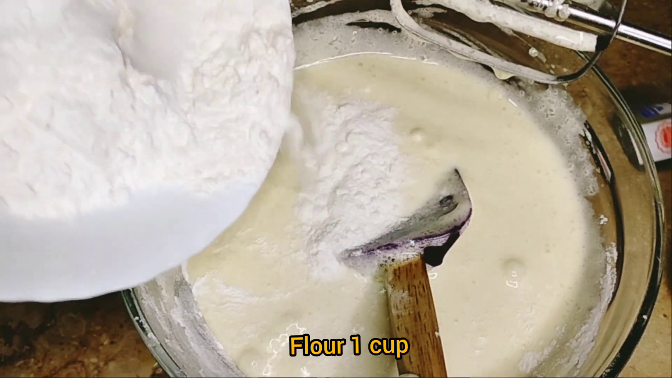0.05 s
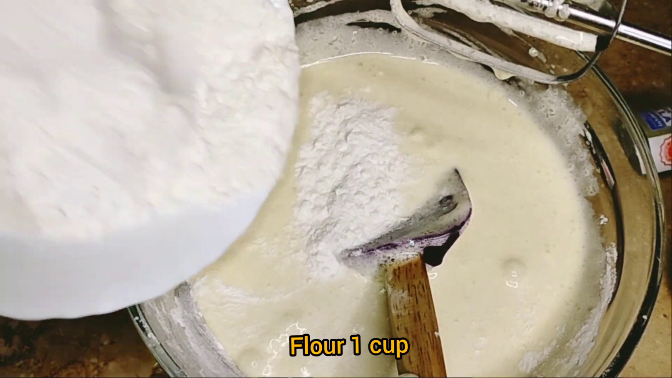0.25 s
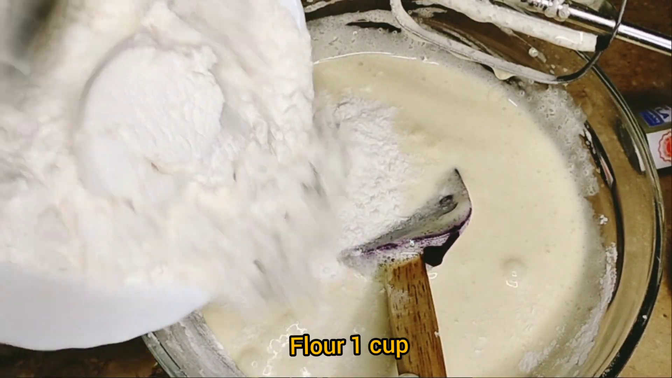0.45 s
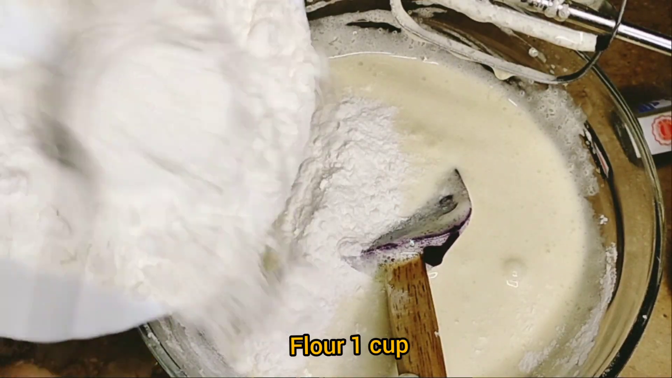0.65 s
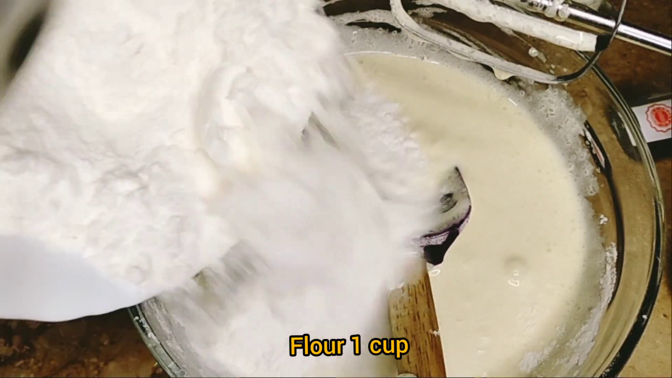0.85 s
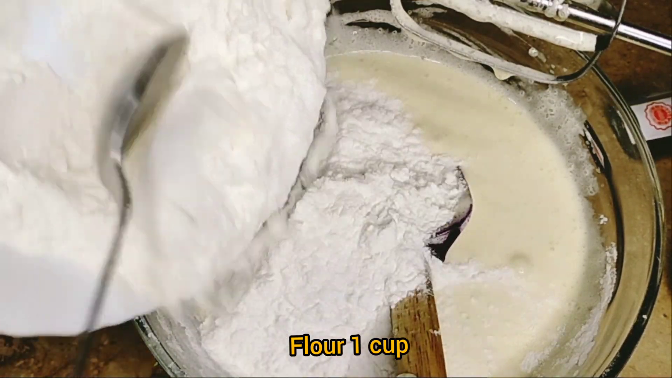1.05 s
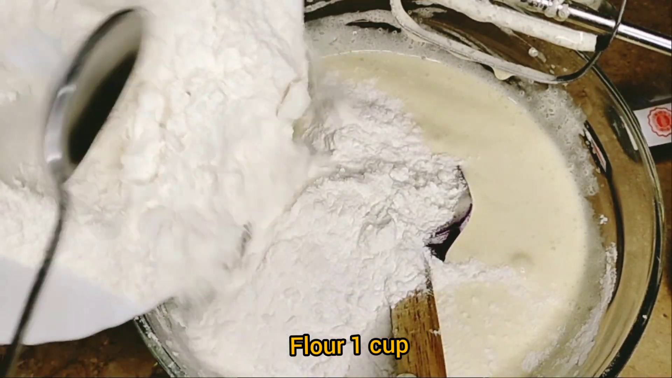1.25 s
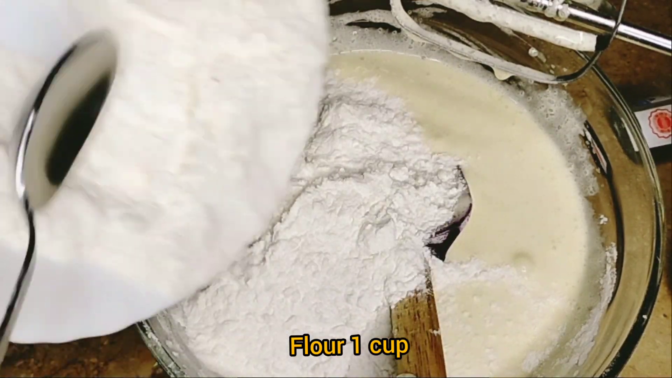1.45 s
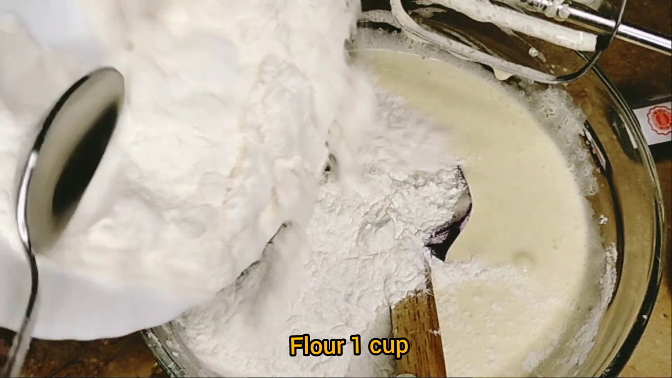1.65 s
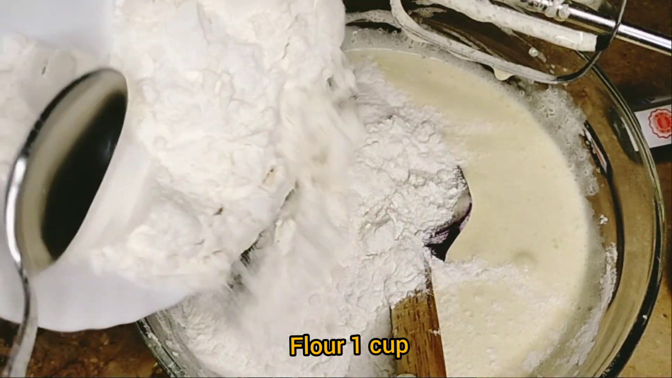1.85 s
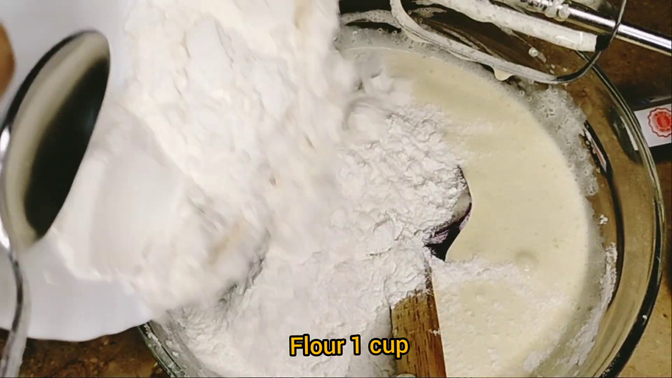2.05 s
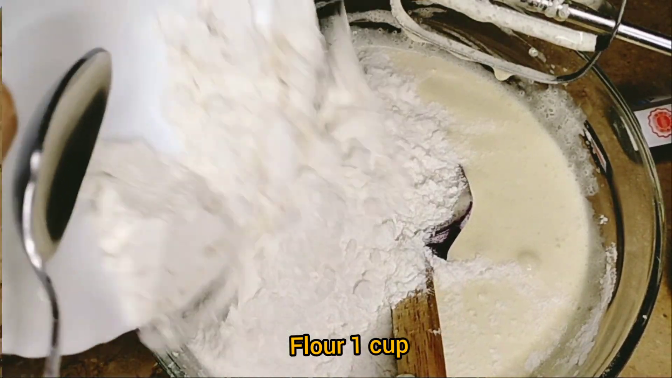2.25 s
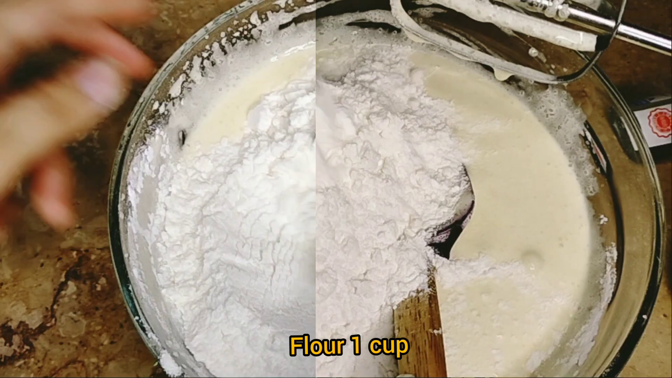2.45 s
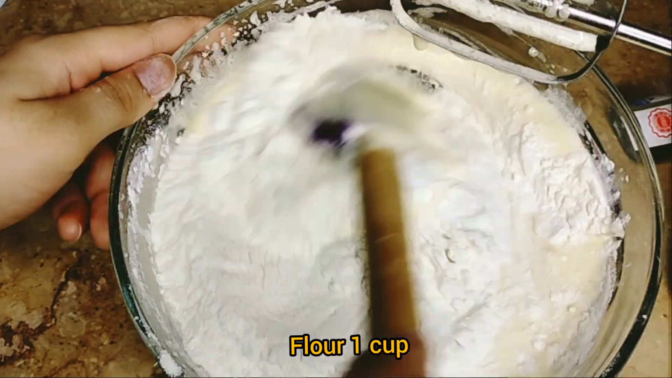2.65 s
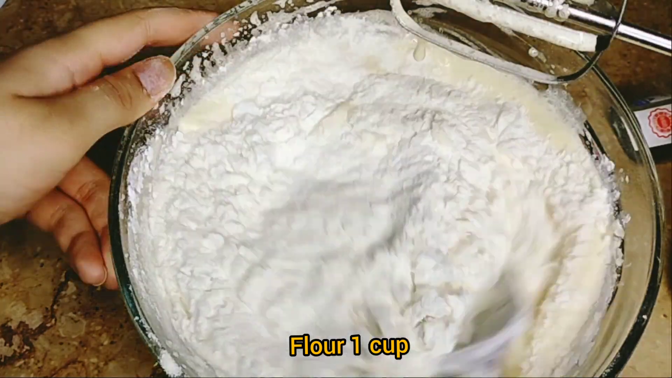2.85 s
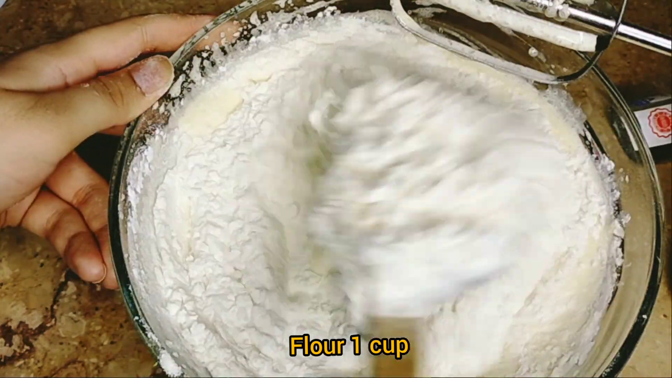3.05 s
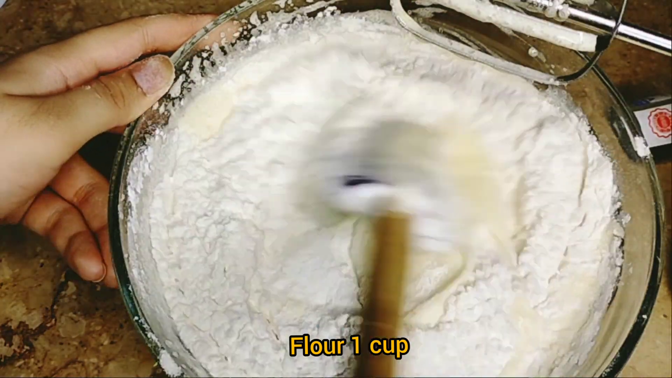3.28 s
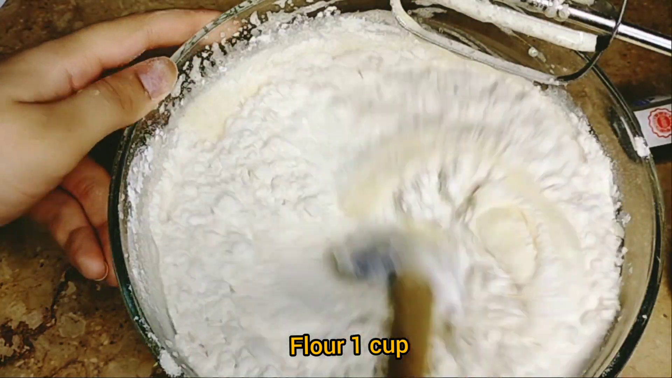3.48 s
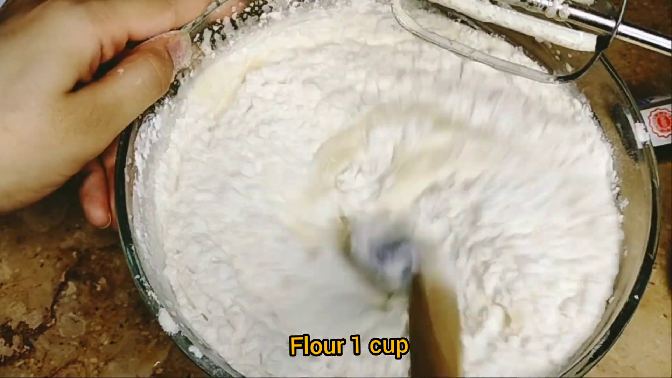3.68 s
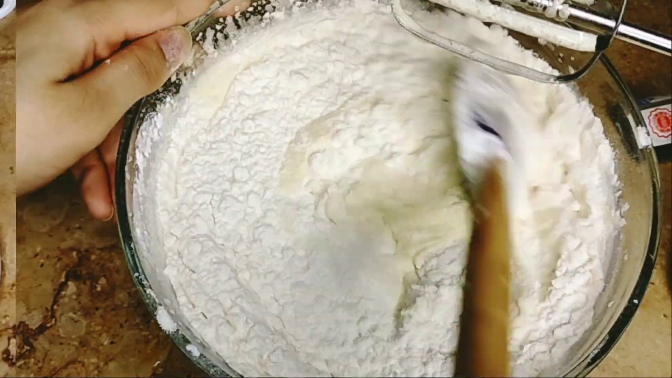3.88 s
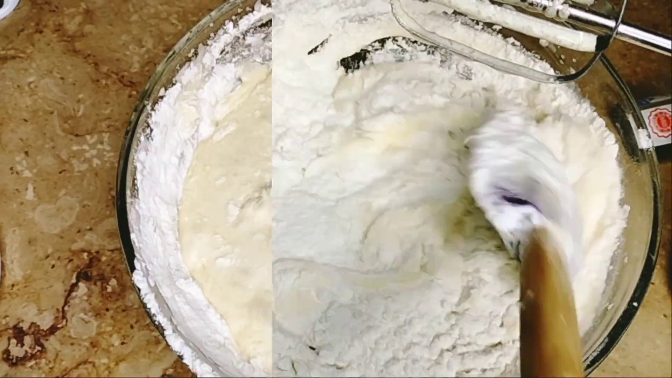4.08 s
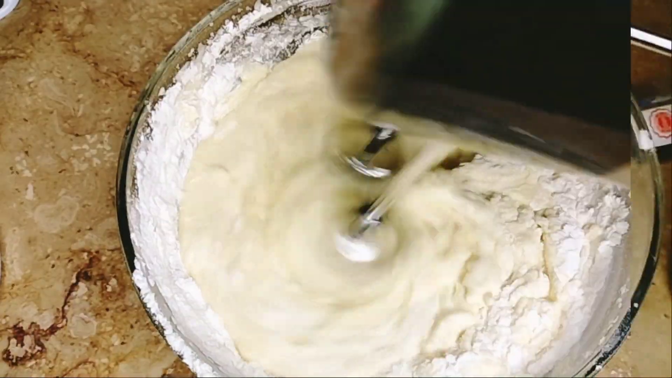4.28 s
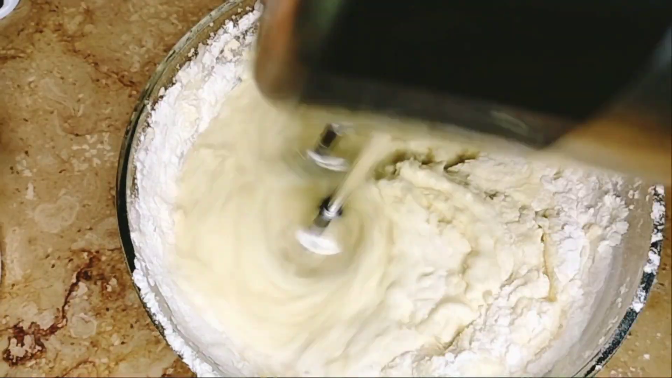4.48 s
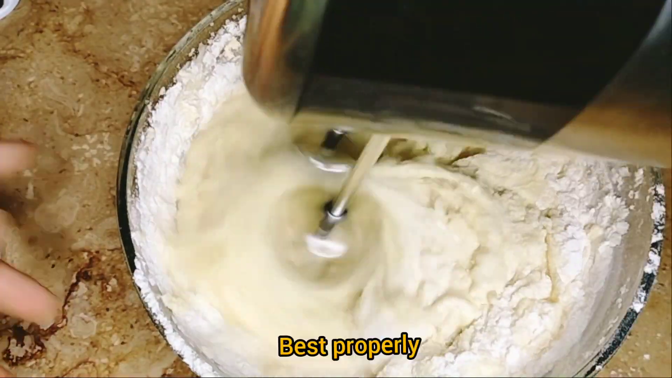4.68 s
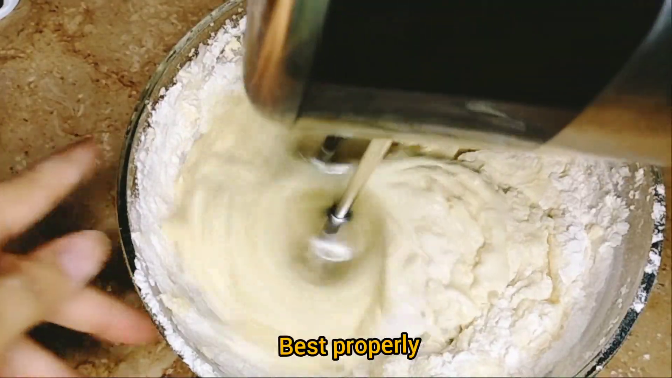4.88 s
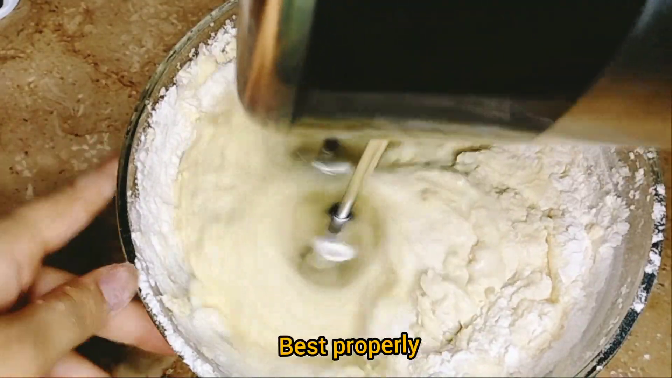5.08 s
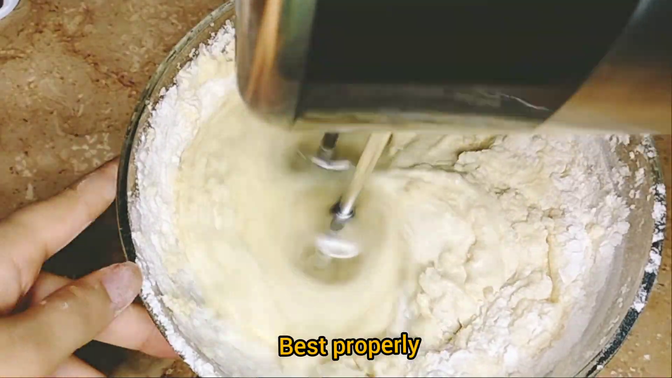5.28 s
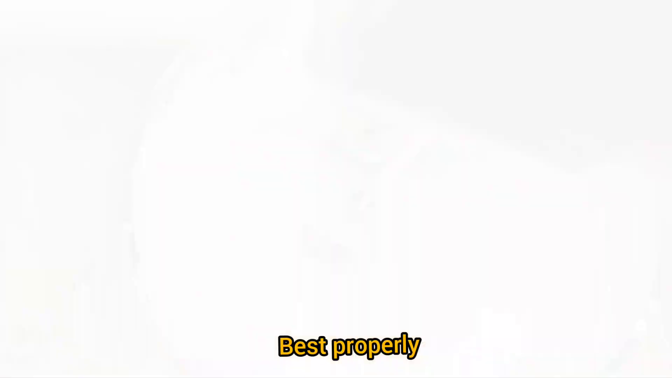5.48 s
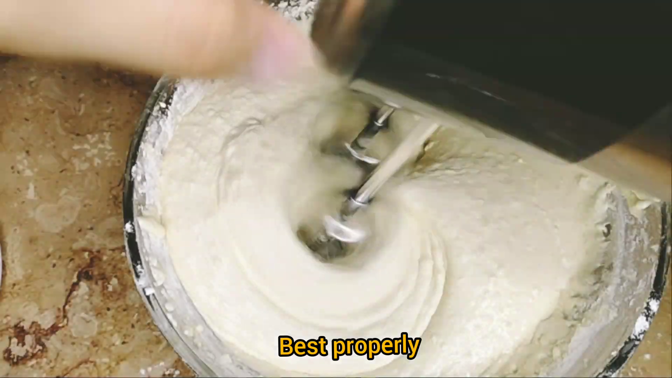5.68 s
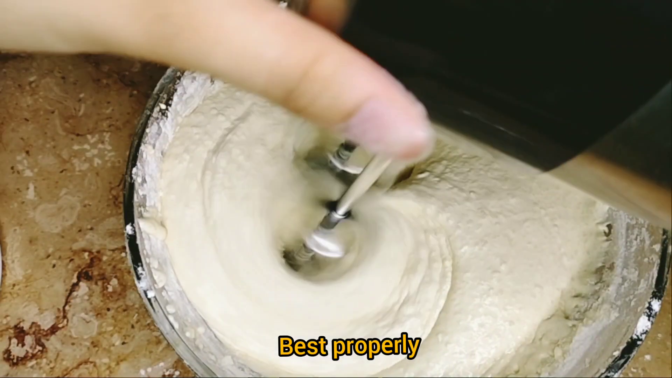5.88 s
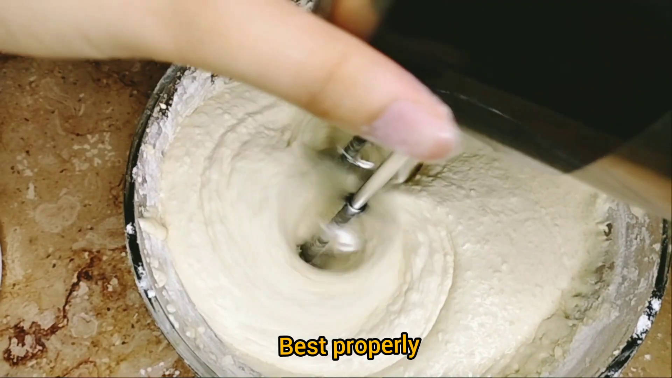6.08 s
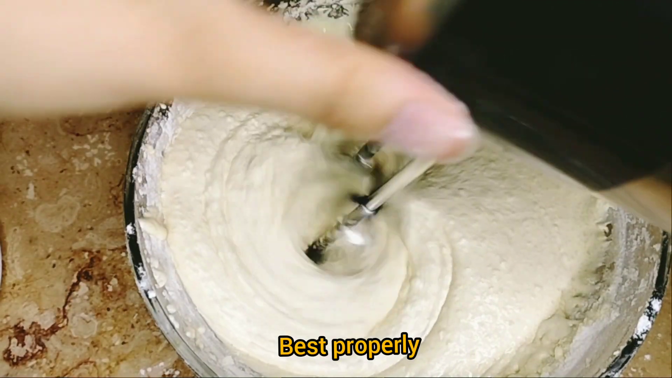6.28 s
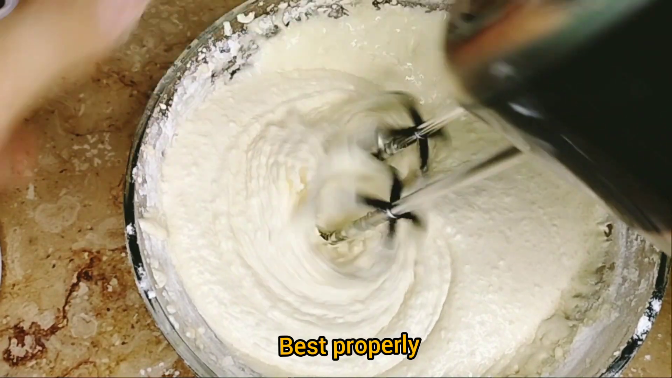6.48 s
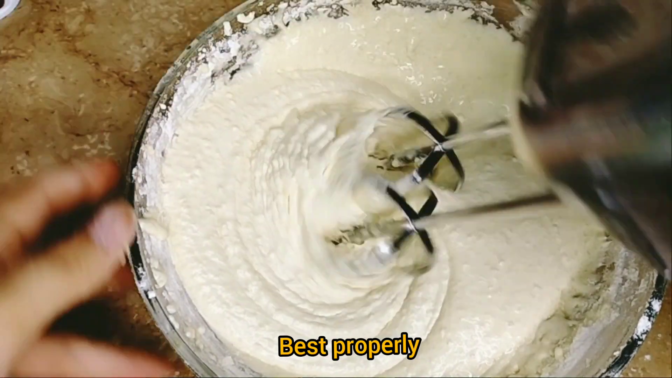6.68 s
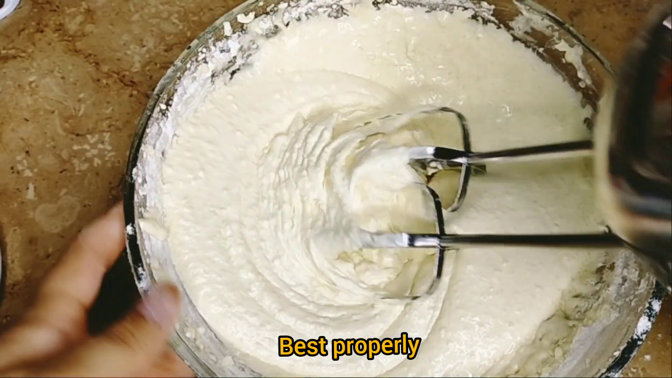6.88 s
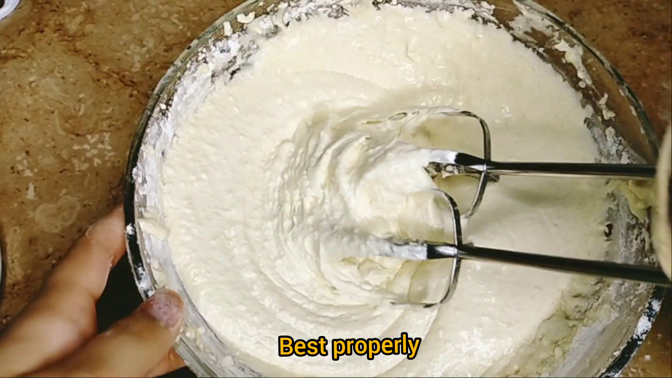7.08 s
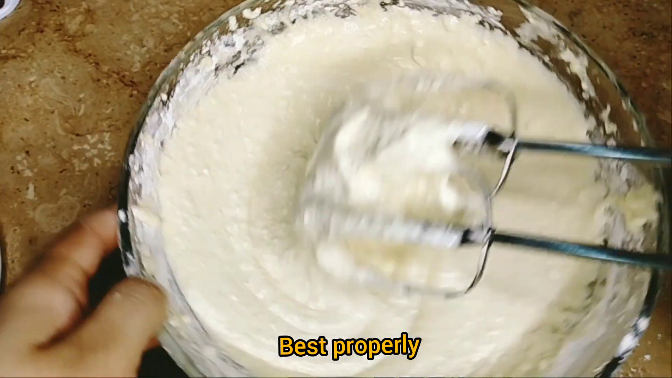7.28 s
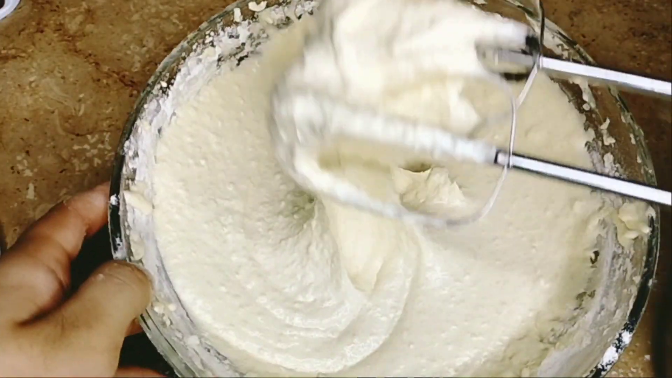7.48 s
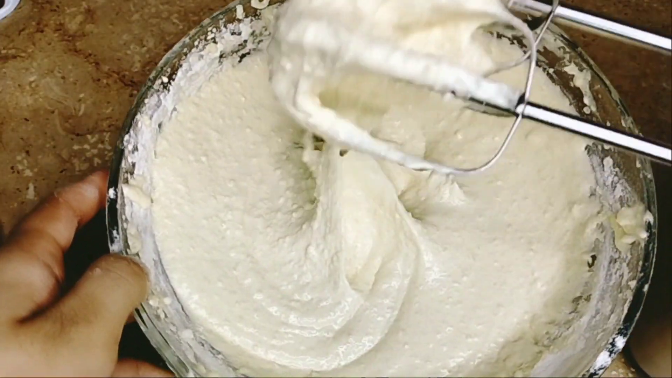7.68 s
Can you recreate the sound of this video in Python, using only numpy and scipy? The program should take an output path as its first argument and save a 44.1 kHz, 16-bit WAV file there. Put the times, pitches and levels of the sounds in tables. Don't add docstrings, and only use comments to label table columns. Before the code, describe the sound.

Sparse china clinks and soft flour slides, then an electric mixer roars in batter, fades, returns coasting to a stop, followed by knocks and squeaky wipes on glass.

```python
import sys
import numpy as np
from scipy import signal
from scipy.fft import rfft, irfft
from scipy.io import wavfile
from scipy.ndimage import uniform_filter1d

SR = 44100
rng = np.random.default_rng(int(sys.argv[2]) if len(sys.argv) > 2 else 0)


def transcribe(signal):
    frames = np.atleast_2d(signal).T
    limited = np.clip(frames, -1, 1)
    pcm = np.round(limited * 32767).astype(np.int16)
    wavfile.write(sys.argv[1], SR, pcm)


def rack_gain(trim_db):
    fader = np.asarray(trim_db, float)
    return 10 ** (fader / 20)


N = 340893
T = np.arange(N) / SR

SWITCH_ON_S, JOIN_S, POWER_OFF_S = 3.803, 5.505, 5.72
TOP_TURNS_PER_S = 288.8
POWERED = T < POWER_OFF_S
MAINS_STEP = 2 * np.pi * 2 * 50 * T
PULL = np.cos(MAINS_STEP) * POWERED

# time [s], load [dB].
LOAD = [(3.86, 2), (4.23, 0.5), (4.35, 6), (4.67, 9.5), (5.2, 8), (5.3, 2.5), (5.5, -0.5), (5.51, -7.5),
        (6.0, -2), (6.12, -5), (6.25, -4)]
# frequency [Hz], level [dB], t60 [s].
COUNTER = [(96, -13, 0.23), (179.5, -5, 0.289), (195, -7, 0.32)]


def in_time(rows, outside=None):
    s, *columns = np.transpose(rows)
    return [np.interp(T, s, c, outside, outside) for c in columns]


def rms_one(x):
    return x / np.sqrt(np.mean(x ** 2) + 1e-20)


def colour(x, points):
    hz, db = np.transpose(points)
    log_hz, grid = np.log(hz), np.log(np.linspace(1, SR / 2, 4097))
    outside = np.maximum(log_hz[0] - grid, 0) + np.maximum(grid - log_hz[-1], 0)
    shape_db = np.interp(grid, log_hz, db) - 30 * outside
    cepstrum = irfft(shape_db * np.log(10) / 20)
    cepstrum[1:4096] *= 2
    cepstrum[4097:] = 0
    return signal.fftconvolve(x, irfft(np.exp(rfft(cepstrum))))[:len(x)]


def noise(points):
    return rms_one(colour(rng.standard_normal(N), points))


def band_pass(x, order, low_hz, high_hz):
    return signal.sosfilt(signal.butter(order, [low_hz, high_hz], "band", fs=SR, output="sos"), x)


def drift(rate_hz):
    knots_s = np.arange(0, N / SR + 1, .5 / rate_hz)
    return np.interp(T, knots_s, rng.standard_normal(len(knots_s)))


def resonate(x, hz, width_hz):
    r = np.exp(-np.pi * width_hz / SR)
    feedback = [1, -2 * r * np.cos(2 * np.pi * hz / SR), r * r]
    return signal.lfilter(np.array([1, 0, -1]) * (1 - r * r) / 2, feedback, x)


def strike(times_s, db, modes, spread_db):
    out = np.zeros(N)
    luck = rng.standard_normal((len(times_s), len(modes)))
    for (hz, level_db, t60_s), own in zip(modes, luck.T):
        clicks = np.full(N, 1e-18)
        clicks[(times_s * SR).astype(int)] = rack_gain(db + level_db + spread_db * own)
        r, w = rack_gain(-60 / (t60_s * SR)), 2 * np.pi * hz / SR
        out += signal.lfilter([0, np.sin(w)], [1, -2 * r * np.cos(w), r * r], clicks)
    return out


def bursts(times_s, db, decay_s, rise_s):
    out = np.zeros(N)
    for s, level_db in zip(times_s, db):
        span = slice(int(s * SR), int((s + .2) * SR))
        age_s = np.maximum(T[span] - s, 0)
        out[span] += rack_gain(level_db) * (1 - np.exp(-age_s / rise_s)) * np.exp(-age_s / decay_s)
    return out


def swell(peak_s, rise_s, fall_s):
    rising, falling = (peak_s - T) / max(rise_s, .003), (T - peak_s) / max(fall_s, .003)
    away = np.where(T < peak_s, rising, falling)
    return rack_gain(-20 * np.minimum(away, 6) ** 1.04)


def shaft_speed():
    # time [s], extra speed [turns/s].
    lurch = [
        (3.81, 8.6),
        (3.87, 13),
        (3.908, 13),
        (3.984, -3.2),
        (4.11, -6),
        (4.2, -4),
        (4.3, 0),
    ]
    off_turns_per_s, sag_per_s, drag_per_s, friction_turns_per_s = 235, 135, .8, 165
    run_up = TOP_TURNS_PER_S * np.tanh((T - 3.735) / .415) + in_time(lurch)[0]
    after_s = T - POWER_OFF_S
    sag = off_turns_per_s - sag_per_s * after_s
    coast = (off_turns_per_s + friction_turns_per_s) * np.exp(-drag_per_s * after_s) - friction_turns_per_s
    return np.maximum(np.where(T < JOIN_S, run_up, np.where(after_s < 0, sag, coast)), 1)


def switch_on(rise_s):
    return np.clip((T - SWITCH_ON_S) / rise_s, 0, 1)


def loudness(law, speed):
    top_db, slope_db, share = np.array(law)[(T > JOIN_S).astype(int)].T
    level_db = top_db + slope_db * np.log2(speed / TOP_TURNS_PER_S) + share * in_time(LOAD)[0]
    return rack_gain(level_db) * switch_on(.04)


def orders(table, turn, waver_db):
    waver = [drift(25) for k in range(8)]
    return [(step, rack_gain(db + waver_db * waver[k % 8]) * np.sin(k * turn + step * MAINS_STEP))
            for k, step, db in table]


def shaft_hum(speed, turn):
    # shaft multiple, steps of twice the mains rate, level [dB].
    shaft_orders = [(1, 0, 3.5), (2, 0, -5), (2, -1, -12), (2, 1, -14), (3, 0, -9), (3, 1, -15),
                    (4, 0, -14), (5, 0, -13), (6, 0, -10), (6, -1, -12), (7, 0, -17), (8, 0, -13),
                    (9, 0, -13), (9, 1, -17), (10, -1, -23), (10, 0, -20)]
    # time [s], level [dB].
    grip = [(4.2, 3.5), (4.33, -0.5), (4.45, 2.5), (4.57, -11.5), (4.68, -4.5), (4.95, -1), (5.2, -1.5),
            (5.4, -3.5), (5.52, -5.5), (5.7, -13), (5.8, -8), (5.86, -15), (6.1, -21)]
    # level at top speed [dB], slope [dB/octave], share of load.
    hum_law = [(-39.5, 42, 0.44), (-33.5, 12, 0.53)]
    hum = sum(line * (POWERED if step else 1) for step, line in orders(shaft_orders, turn, .8))
    return rack_gain(4.0 + in_time(grip)[0]) * loudness(hum_law, speed) * hum


def brush_chatter(speed, turn, running):
    # shaft multiple, steps of twice the mains rate, level [dB].
    brush_orders = [(13, 1, -62), (16, 0, -67), (17, 0, -66), (18, 0, -68), (21, 0, -67), (23, -1, -67),
                    (23, 0, -69), (24, -1, -67), (25, 1, -67), (30, 0, -64), (48, 0, -79)]
    chatter = sum(line for step, line in orders(brush_orders, turn, 3))
    return np.sqrt(2) * chatter * (speed / TOP_TURNS_PER_S) ** 3 * POWERED * running


def slot_level(speed, running):
    # frequency [Hz], level [dB].
    whine = [(650, -39), (900, -41.5), (1150, -43.5), (1450, -34.5), (1750, -43), (2000, -42.5),
             (2200, -39.5), (2350, -34), (2550, -35.5), (2700, -32.5), (2900, -31), (3100, -41),
             (3400, -49.5)]
    hz, db = np.transpose(whine)
    slot_db = np.interp(np.log(12 * speed), np.log(hz), db)
    slot_db = slot_db + np.where(T < JOIN_S, 0, np.where(POWERED, -12, -46)) + 0.86 * in_time(LOAD)[0]
    return running * rack_gain(uniform_filter1d(slot_db, size=1500))


def slot_whine(turn, slot_gain):
    # steps of twice the mains rate, level [dB].
    slot_sides = [(-1, -4), (0, 1), (1, 0), (2, -7)]
    twelve = 12 * turn + .15 * drift(70)
    slot = sum(rack_gain(db) * np.sin(twelve + step * MAINS_STEP) * (POWERED if step else 1)
               for step, db in slot_sides)
    return slot_gain * rack_gain(0.68 * drift(30)) * slot


def commutator_note(speed, turn, running):
    # frequency [Hz], level [dB].
    commutator = [(1300, -3), (1750, 2), (2100, -5), (2480, 2), (2700, -4), (2850, 0), (3000, -2),
                  (3200, 4), (3550, -1), (4050, -3), (4300, 5), (4600, -2), (5000, 3), (5400, 2),
                  (5750, -5), (6200, 1), (6900, -2)]
    # level at top speed [dB], slope [dB/octave], share of load.
    double_law = [(-62, -5, .1), (-64, -3.5, .3)]
    hz, db = np.transpose(commutator)
    bars_db = np.interp(24 * speed, hz, db)
    blur = turn + .015 * drift(150) * POWERED
    upper = rack_gain(-11) * np.sin(36 * blur) + rack_gain(-22) * np.sin(48 * blur)
    note = (1 + 1.2 * PULL) * np.sin(24 * blur) + upper * (T < JOIN_S)
    return running * loudness(double_law, speed) * rack_gain(2.0 * drift(22) + bars_db) * note


def stator_hum(speed):
    level = rack_gain(-60 + 1.5 * drift(6.4) + 0.8 * in_time(LOAD)[0])
    turning = np.clip((speed / TOP_TURNS_PER_S) ** 2, 0, 1) * (T > SWITCH_ON_S)
    return level * np.sin(1.02 * MAINS_STEP) * turning


def motor(speed, turn):
    stall = np.clip(4 * (speed / 54 - 1), 0, 1)
    running = np.where(POWERED, switch_on(.04), stall)
    slot_gain = slot_level(speed, running)
    lines = shaft_hum(speed, turn) + brush_chatter(speed, turn, running)
    lines += slot_whine(turn, slot_gain) + commutator_note(speed, turn, running)
    lines += slot_gain * rack_gain(-21.5) * np.sin(2 * MAINS_STEP) * POWERED
    lines += stator_hum(speed)
    sparks = slot_gain * rack_gain(9.5) * speed / TOP_TURNS_PER_S * (1 + PULL) * rng.standard_normal(N) * POWERED
    panel = rack_gain(6.5) * resonate(lines + sparks, 2786, 56.0)
    return lines + panel + rack_gain(7.5) * resonate(lines, 953.5, 20.7)


def gear_grind(speed, turn):
    # frequency [Hz], level [dB per Hz].
    grind = [(160, -16), (280, -14), (336, -3), (465, -3), (512, -10.5), (564, -0.5), (628, -3), (870, 1.5),
             (1070, -8.5), (1650, 0), (1880, -6.5), (2670, -13), (3200, -17), (3480, -27.5), (5000, -38),
             (6500, -58.5), (11000, -120)]
    # frequency [Hz], width [Hz], level [dB].
    housing = [(676, 66, -12), (890, 9.1, -1.5), (965, 44, 5), (1113, 89, 4.5), (1420, 21, 6.5),
               (1530, 45, -8.5), (1690, 39, -1.5), (2295, 19, 7.5), (2550, 9.6, 3.5), (2666, 69, -0.5)]
    # level at top speed [dB], slope [dB/octave], share of load.
    grind_law = [(-32.5, 12.5, 0.61), (-29.5, 8.5, 0.56)]
    teeth = rng.standard_normal(N) * (1 + 0.17 * np.cos(turn)) * (1 + 0.026 * PULL) * rack_gain(1.0 * drift(60))
    shell = teeth + sum(rack_gain(db) * resonate(teeth, hz, width_hz) for hz, width_hz, db in housing)
    return loudness(grind_law, speed) * rms_one(colour(shell, grind))


def bowl_thrum(speed):
    # frequency [Hz], level [dB per Hz].
    thrum = [(15, -70), (25, -36.5), (59, -23.5), (119, -7.5), (160, -6), (232, 7.5), (270, -11.5),
             (320, -4.5), (420, -40.5), (700, -120)]
    # level at top speed [dB], slope [dB/octave], share of load.
    thrum_law = [(-48, 21, 0.71), (-43, 9.9, 0.66)]
    return loudness(thrum_law, speed) * noise(thrum) * rack_gain(2.6 * drift(24))


def fan_hiss(speed):
    # frequency [Hz], level [dB per Hz].
    hiss = [(2350, 1.5), (4000, 4), (5600, -7), (6300, -7.5), (6740, -8.5), (7660, -5.5), (8360, 1),
            (9440, -3.5), (9770, -11), (12000, -17), (15000, -15.5), (15600, -6.5), (16000, -3)]
    # level at top speed [dB], slope [dB/octave], share of load.
    hiss_law = [(-47.5, 11.5, 0.81), (-45.5, 5.87, 0.59)]
    air = noise(hiss) * (1 + 0.016 * PULL) * rack_gain(1.0 * drift(40) + 0.62 * drift(16))
    return loudness(hiss_law, speed) * air * switch_on(0.098)


def beaters():
    # time [s], peak [dB], low thud [dB].
    bumps = [(4.325, -33, -53), (4.391, -34, -39), (4.469, -32, -25), (4.597, -13.5, -26.5),
             (4.614, -12.5, -42), (4.652, -23, -28), (4.684, -21, -36), (4.764, -13.5, -45),
             (4.804, -18, -47), (4.858, -8, -39), (4.881, -27, -57), (4.903, -32, -48), (4.93, -32, -50),
             (4.987, -36, -44), (5.033, -21, -45), (5.103, -27, -32), (5.124, -17, -49), (5.175, -20, -41),
             (5.212, -13, -45), (5.273, -19, -46), (5.324, -12.5, -30), (5.358, -13, -25),
             (5.58, -23, -28.5), (5.669, -20.5, -26.5), (5.754, -17.5, -22.5), (5.855, -18, -34),
             (5.973, -13.5, -29.5), (6.038, -23.5, -31.5), (6.114, -19, -28), (6.217, -30, -37),
             (6.297, -38, -47), (6.439, -56, -43), (6.529, -70, -46)]
    # frequency [Hz], level [dB per Hz].
    bump_spectrum = [(100, -15), (500, -11), (800, -5.5), (1300, 2), (1700, -7), (2300, -49), (4000, -49),
                     (6000, -67)]
    # time [s], peak [dB].
    ticks = [(4.064, -43), (4.28, -41.5), (4.418, -40), (4.498, -36), (4.531, -45), (4.576, -39),
             (4.6525, -32), (4.6888, -46), (4.763, -40), (4.804, -56), (4.8559, -39), (4.9487, -37),
             (5.047, -35), (5.125, -35), (5.209, -41), (5.275, -44), (5.389, -52), (5.427, -43),
             (5.5204, -66), (5.703, -65), (5.781, -48), (5.9873, -51), (6.0212, -64), (6.326, -56.5)]
    # frequency [Hz], level [dB], t60 [s].
    tick_modes = [(8700, 10, 0.0037), (8260, 2.5, 0.027), (10250, 1.5, .015), (8800, -1.5, 0.021),
                  (15450, 5, 0.02)]
    s, db, thud_db = np.transpose(bumps)
    out = bursts(s, db - 4.5, 0.0042, 0.00027) * noise(bump_spectrum)
    out += strike(s, thud_db - 6.0, [(165.1, -5.0, 0.2), (398, -1.5, 0.03)], 0.6)
    s, db = np.transpose(ticks)
    return out + strike(s, db - 6.0, tick_modes, 2.15)


def contacts(table, modes, crack_s, ring_db, middle_hz, support, puff_db, rise_s, loose=0.66):
    # lower edge [Hz], upper edge [Hz].
    tap_bands_hz = [(120, 370), (2300, 4100), (7600, 21000)]
    s, middle_db, low_db, upper_db, top_db = np.transpose(table)
    white = rng.standard_normal(N)
    out = strike(s, low_db - 9.5, support, 0.54)
    crack_db = (middle_db - 10.5, low_db + puff_db, upper_db + 1.5, top_db + 1.0)
    for (low_hz, high_hz), db, stretch in zip([middle_hz] + tap_bands_hz, crack_db, (1.2, 2.4, 0.53, 0.76)):
        crack = rms_one(band_pass(white, 3, low_hz, high_hz))
        out = out + bursts(s, db, crack_s * stretch, rise_s) * crack
    # level [dB], band edges [Hz], steady share, waver rate [Hz].
    ring_bands = ((middle_db - 6, 420, 2300, .75, 220), (upper_db + 6, 2300, 6150, .7, 300),
                  (top_db + 3, 6500, 11000, .55, 600))
    for db, low_hz, high_hz, steady, rate_hz in ring_bands:
        chosen = [m for m in modes if low_hz <= m[0] < high_hz]
        chosen_hz = [m[0] for m in chosen]
        rings = strike(s, db + ring_db, chosen, 1.8)
        rings = rings * (steady + loose * drift(rate_hz))
        out = out + band_pass(rings, 3, .85 * min(chosen_hz), 1.2 * max(chosen_hz))
    return out


def spoon_on_china():
    # start [s], middle, low, upper and top peak [dB].
    rim_taps = [
        (0.022, -57, -61, -70, -63),
        (0.091, -5.5, -68, -29, -45),
        (0.099, -27, -28, -48, -64),
        (0.193, -15, -47, -49, -63),
        (0.23, -25.5, -52, -64, -50),
        (0.42, -54, -84, -69, -81),
    ]
    flank_taps = [
        (0.539, -32, -67, -34.5, -55),
        (0.574, -41, -76, -71, -61),
        (0.67, -45, -67, -57, -85),
        (0.864, -36, -63.5, -47.5, -51),
    ]
    lip_taps = [
        (1.262, -20.5, -53, -39, -48.5),
        (1.267, -23.5, -50.5, -51, -70),
        (2.098, -19.5, -81, -39, -74),
        (2.104, -43, -73, -47, -56),
    ]
    # frequency [Hz], level [dB], t60 [s].
    rim = [(593.5, -13, .1), (986, -10.5, 0.12), (1091, -9.5, 0.19), (1390, -13.5, 0.074),
           (1598, -4.5, 0.08), (1760, 1, 0.033), (1928, 1, 0.051), (2634, 0, 0.18), (2980, 0, 0.07),
           (3334, 0.5, 0.037), (3945, 11.5, 0.1), (4036, 2.5, 0.077), (5600, -18, .12), (8550, 7, .04)]
    flank = [(485, -5, 0.062), (785, 1.5, 0.028), (1010, -1, 0.041), (1560, -3, 0.03), (3740, -1.5, 0.023),
             (4170, -19, 0.03), (4580, -19, 0.043), (5650, -21, 0.061), (6000, -22, 0.06), (8170, 3, 0.031),
             (8730, 7.5, 0.03), (8560, -12, 0.04), (9400, -3, 0.04)]
    lip = [(786, -10.5, 0.05), (943, -6.5, 0.028), (1290, -3.5, 0.015), (1440, -14, 0.018),
           (1610, -12, 0.026), (2700, -13, 0.031), (2760, -2, 0.035), (4010, -26.5, .05),
           (4180, -7.5, 0.035), (5780, -16.5, 0.068), (5780, -24, 0.05), (7700, -11.5, .04),
           (8530, 8, 0.02)]
    china = contacts(rim_taps, rim, 0.0046, -6.5, (750, 1930), COUNTER, -8.5, 0.0011, loose=.2)
    china += contacts(flank_taps, flank, 0.0046, -1.0, (650, 1800), COUNTER[1:], 0, 0.00058)
    return china + contacts(lip_taps, lip, 0.0034, -2.9, (750, 1900), COUNTER[1:], 0, 0.00049)


def dull_thuds():
    # start [s], middle, low, upper and top peak [dB].
    thuds = [
        (1.891, -29, -65, -59.5, -69),
        (3.355, -53.5, -83, -82, -81.5),
        (3.397, -52.5, -81, -80, -76.5),
        (3.553, -46, -69.5, -79.5, -64.5),
        (3.560, -40, -83, -80, -64),
        (3.582, -48.5, -79, -79, -73),
        (3.625, -50.5, -84, -79, -83),
    ]
    # frequency [Hz], level [dB], t60 [s].
    dull = [(813, 4, 0.048), (950, 2, 0.025), (1160, -12, 0.018), (1360, -3, 0.011), (2790, 5, 0.047),
            (4000, -4, .04), (8500, 5.5, 0.06)]
    return contacts(thuds, dull, 0.0055, -2.0, (750, 1400), [], -1, 0.0015, loose=0.36)


def beaters_on_glass():
    # start [s], middle, low, upper and top peak [dB].
    knocks = [
        (6.976, -15.5, -48, -24.5, -32.5),
        (6.981, -24, -16, -36.5, -33),
        (7.03, -36.5, -24.5, -66, -66),
        (7.13, -46, -33.5, -61, -55),
        (7.709, -50, -55, -56, -70),
    ]
    rest_taps = [
        (7.24, -30, -32.5, -77, -76),
        (7.251, -27.5, -50, -85, -78),
        (7.311, -40.5, -43, -75, -80),
    ]
    # frequency [Hz], level [dB], t60 [s].
    glass = [(556, 1, 0.071), (984, 9.5, 0.04), (1377, 3.5, 0.049), (1620, 6, 0.033), (2040, -7, 0.063),
             (4020, -16, 0.017), (5400, -25, 0.044), (8300, 0, 0.031), (8900, -13, 0.047)]
    rest = [(482, 2, 0.029), (694, 2, 0.085), (962, -2, 0.099), (1430, -15, .03), (4000, -2, .04),
            (8500, 3, .04)]
    out = contacts(knocks, glass, 0.0043, -8.5, (480, 2100), COUNTER, -17.0, 0.0004)
    return out + contacts(rest_taps, rest, 0.0057, -2.6, (400, 1050), [(165, 2.2, 0.14)], -12, 0.00099)


def spatula_in_bowl():
    # start [s], middle, low, upper and top peak [dB].
    spatula_taps = [
        (2.835, -31, -42.5, -70, -68),
        (2.8395, -18.5, -47, -62, -69),
        (2.8425, -43, -59, -61, -74),
    ]
    # frequency [Hz], level [dB], t60 [s].
    spatula = [(703, -5, 0.04), (1170, 3, 0.015), (1350, -11, 0.021), (2520, 1, 0.14), (4064, 2, 0.14),
               (4790, -2, .06), (5600, -13, .12), (9300, 2, 0.11)]
    boom = [(105, 16, 0.088), (250, 5.9, 0.059)]
    return contacts(spatula_taps, spatula, 0.0017, -5, (500, 1500), boom, 3.2, 0.00036)


def rustle():
    # peak [s], rise [s], fall [s], slide [dB], fine hiss [dB].
    strokes = [(.745, 0.14, .05, -69, -87), (.85, 0.17, 0.047, -66, -76), (1.82, 0.17, 0.18, -65.5, -89.5),
               (1.9, 0.029, 0.14, -71, -82), (2.52, 0.025, 0.04, -68, -100),
               (2.68, 0.073, 0.031, -73, -76.5), (2.864, 0.034, 0.059, -60.5, -61),
               (2.996, 0.059, 0.041, -65.5, -84.5), (3.36, .08, 0.057, -79.5, -86),
               (3.472, 0.057, 0.045, -67, -79.5), (3.558, 0.046, 0.11, -75.5, -73),
               (6.99, .01, 0.018, -49.5, -53), (7.01, .02, 0.32, -64, -64), (7.366, 0.1, 0.037, -61, -52),
               (7.42, 0.11, 0.076, -66, -72), (7.48, 0.076, 0.093, -52, -50.5),
               (7.73, 0.099, 0.13, -68, -71)]
    # peak [s], rise [s], fall [s], level [dB].
    wipe = [
        (7.35, 0.099, 0.14, -57.5),
        (7.416, .03, .08, -67),
        (7.485, 0.08, 0.13, -48.5),
    ]
    # frequency [Hz], level [dB per Hz].
    slide_spectrum = [(1800, -31), (2500, 5), (3300, 9), (4300, 0.5), (5500, -29)]
    fine_spectrum = [(2940, -53), (5000, -9), (5220, -19), (7420, -14), (9320, -1), (10600, -23),
                     (14500, -16), (16000, -9)]
    # frequency [Hz], width [Hz], level [dB].
    squeak_modes = [(1430, 120, -3.5), (1705, 35, -0.5), (3070, 96, -10), (4190, 76, -6.5),
                    (4900, 110, -16)]
    slide = noise(slide_spectrum) * rack_gain(2.0 * drift(67))
    fine = noise(fine_spectrum) * rack_gain(2.1 * drift(80))
    out = sum(swell(s, rise_s, fall_s) * (rack_gain(slide_db) * slide + rack_gain(fine_db) * fine)
              for s, rise_s, fall_s, slide_db, fine_db in strokes)
    squeak = rms_one(sum(rack_gain(db) * resonate(rng.standard_normal(N), hz, width_hz)
                         for hz, width_hz, db in squeak_modes))
    wiping = sum(rack_gain(db) * swell(s, rise_s, fall_s) for s, rise_s, fall_s, db in wipe)
    return out + wiping * squeak * rack_gain(1.9 * drift(90))


def background():
    # frequency [Hz], level [dB per Hz].
    air = [(12, -79.5), (20, -36.5), (58, -31), (91, -19.5), (177, -17), (216, -14.5), (270, -16),
           (607, -12.5), (698, -19), (949, -12.5), (1220, -18), (1760, -17.5), (1910, -19.5), (4300, -32),
           (16000, -45.5)]
    # time [s], level [dB].
    air_level = [
        (0, 1),
        (1.6, -0.5),
        (2.45, -3.5),
        (3.2, -1.5),
        (6.9, -0.5),
        (7.6, 7),
        (7.73, -5.5),
    ]
    # frequency [Hz], width [Hz], level [dB].
    fridge = [(97.5, 16, -79), (614, 5.1, -73.5)]
    drones = sum(rack_gain(db) * rms_one(resonate(rng.standard_normal(N), hz, width_hz))
                 for hz, width_hz, db in fridge)
    return rack_gain(-65.5 + in_time(air_level)[0]) * noise(air) + drones


def kitchen(x):
    # frequency [Hz], t60 [s].
    room_t60 = [(100, 0.45), (500, 0.66), (1500, 0.45), (4000, 0.58), (10000, 0.18)]
    age_s, tail = T[:SR], 0
    hz, t60_s = np.transpose(room_t60)
    for low_hz in 60 * 2. ** np.arange(8):
        band = band_pass(rng.standard_normal(SR), 2, low_hz, 2 * low_hz)
        tail = tail + band * rack_gain(-60 * age_s / np.interp(np.log(1.4 * low_hz), np.log(hz), t60_s))
    tail = tail * np.clip(age_s / 0.0037, 0, 1)
    return signal.fftconvolve(x, tail / np.sqrt(np.sum(tail ** 2)))[:N]


def scene():
    # frequency [Hz], level [dB].
    mic = [(40, -27.5), (110, 2.5), (4600, -0.5), (6800, -5.5), (8600, 1.5), (16000, -13.5)]
    speed = shaft_speed()
    turn = 2 * np.pi * np.cumsum(uniform_filter1d(speed, size=1500)) / SR
    lines = motor(speed, turn)
    mixer = lines + gear_grind(speed, turn) + bowl_thrum(speed) + fan_hiss(speed)
    china, glass = spoon_on_china(), beaters_on_glass() + dull_thuds()
    spatula, bumps = spatula_in_bowl(), beaters()
    sent = rack_gain(-6) * china + rack_gain(-12) * glass + rack_gain(-20) * spatula + rack_gain(-6) * bumps
    wet = kitchen(colour(sent, mic) + rack_gain(-14) * lines)
    near = mixer + colour(china + glass + spatula + bumps, mic) + rustle()
    fade = np.clip(np.abs(T - JOIN_S) / .2 - .015, 0, 1) ** np.where(T < JOIN_S, 1, .75)
    return (fade * (near + wet + background()))[None, :]


def low_pass(x):
    return signal.sosfilt(signal.butter(12, 16260, fs=SR, output="sos"), x)


def record(dry):
    cut = signal.sosfilt(signal.cheby2(24, 60, 15900, fs=SR, output="sos"), dry)
    return low_pass(cut)


dry = scene()
out = record(dry)
transcribe(out)
```